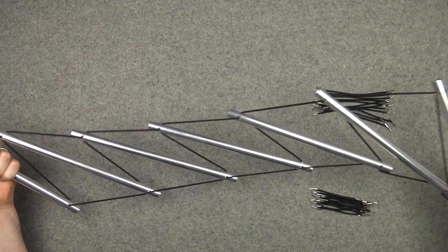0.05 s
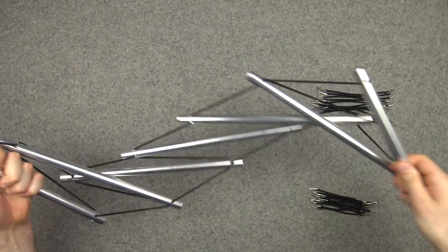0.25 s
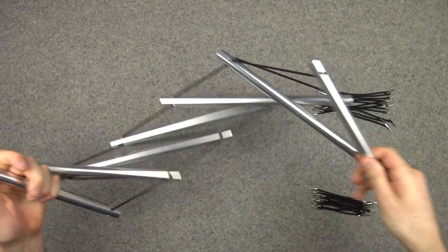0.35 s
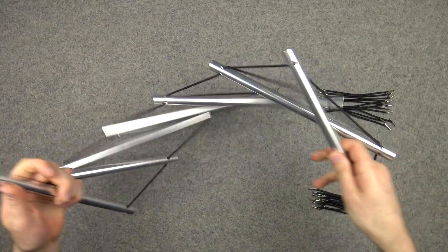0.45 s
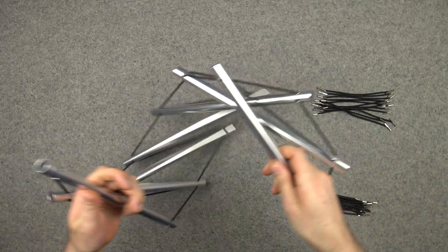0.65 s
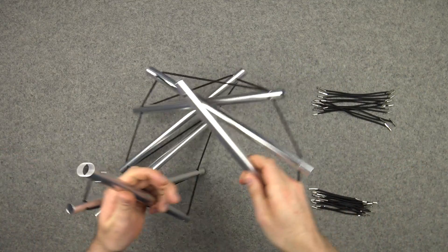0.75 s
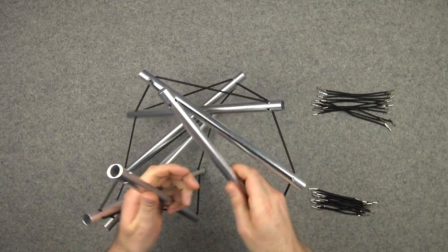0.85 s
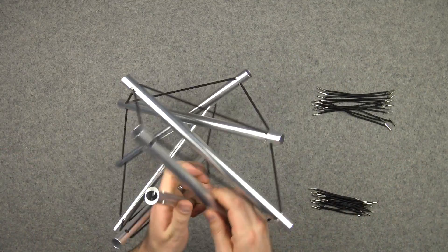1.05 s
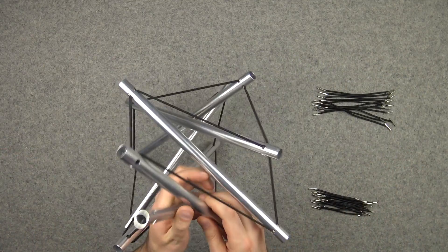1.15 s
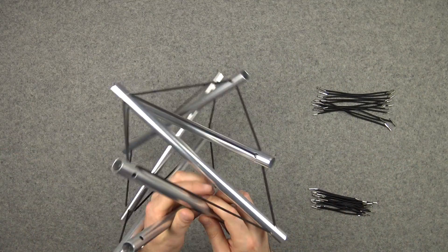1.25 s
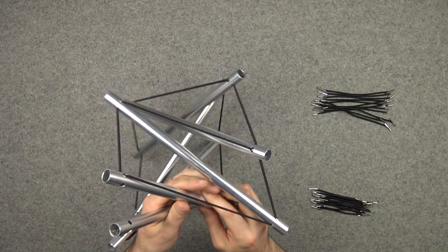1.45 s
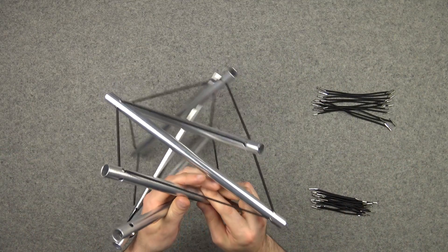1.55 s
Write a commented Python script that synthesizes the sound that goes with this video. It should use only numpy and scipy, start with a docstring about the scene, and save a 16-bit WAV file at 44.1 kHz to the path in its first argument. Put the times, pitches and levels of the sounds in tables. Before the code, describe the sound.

Aluminium tubes clatter together with a bright ring from about 0.2 to 0.5 seconds, ending in a soft bump on carpet. A second burst comes from 0.6 to 0.8 seconds and is damped by hand. The tubes slide with a short rasp around 1 second and clink at 1.15. A faint cord click near 1.4 precedes light taps and rubbing until 1.6, all close over faint room tone.

```python
"""Over a faint room tone, aluminium tubes on elastic cords knock and chatter together in two bursts
as they are gathered up. They bump on a carpeted table, then slide and tap in the hands, close by
in a small room; a cord clicks once. Each collision gives a brief clack and excites the tubes' modes;
sliding friction rasps and drives the same modes, and the hands damp them."""
import sys
import numpy as np
from scipy import signal
from scipy.fft import rfft, irfft
from scipy.io import wavfile

SR = 44100
rng = np.random.default_rng(int(sys.argv[2]) if len(sys.argv) > 2 else 0)


def file_out(sig):
    """Save sig as 16-bit WAV at sys.argv[1]."""
    # one column per channel
    cols = np.atleast_2d(sig).T
    # limit, then scale
    lim = np.clip(cols, -1, 1)
    pcm = np.round(lim * 32767).astype(np.int16)
    wavfile.write(sys.argv[1], SR, pcm)


N = 70560
TIME = np.arange(N) / SR
PIVOT_HZ = 4500  # spectral tilts turn about this frequency


def undb(db):
    return 10 ** (np.asarray(db) / 20)

def unit_rms(x):
    return x / np.sqrt(np.mean(x ** 2) + 1e-20)

def over_time(points):
    return np.interp(TIME, *np.array(points).T)

def over_pitch(points, hz):
    freqs, values = np.array(points).T
    return np.interp(np.log(hz), np.log(freqs), values)

def bin_hz(size):
    return np.maximum(np.fft.rfftfreq(size, 1 / SR), 1)

def add(out, start_s, x):
    i = int(np.clip(start_s * SR, 0, N - 1))
    out[i:i + len(x)] += x[:N - i]


# Each row: frequency in Hz, relative level in dB.
ROOM_TONE_SPECTRUM = [(25, -30), (60, -17.5), (120, -2), (200, -8), (340, 5), (450, -4), (800, -9.5),
                      (1500, -21.5), (4000, -28), (10000, -34.5), (15500, -44.5)]

def room_tone():
    """Filtered noise: a quiet, low background that swells and eases."""
    tone = unit_rms(irfft(rfft(rng.standard_normal(N)) * undb(over_pitch(ROOM_TONE_SPECTRUM, bin_hz(N))), N))
    swell_db = over_time([(.1, -2), (.8, 8), (1.35, 5.5)])
    return tone * undb(-64 + swell_db)


# Bending and wall modes of the nearly equal tubes.
# Each row: frequency in Hz, relative level in dB, free decay time T60 in seconds.
TUBE_MODES = [(991, -22.5, 0.43), (1014.8, -14.5, 0.3), (2688, -4.5, 0.26), (2704, -5.5, 0.19),
              (2784, -11.5, .2), (4900, -9, 0.12), (5054, -3.5, 0.25), (5047, -0.5, 0.18), (5124, -2, 0.21),
              (5280, -10.5, 0.17), (7853, -15.5, 0.34), (7950, -9, 0.33), (8046, -16.5, 0.27),
              (11500, -16, 0.1), (11550, -8, 0.087), (12230, -12.5, 0.061), (12650, -21, .09),
              (12600, -21, 0.04)]

def tube_mode(force, hz, t60):
    """Damped resonance: a unit impulse starts a decaying sine of amplitude 1."""
    r, w = np.exp(-np.log(1000) / (t60 * SR)), 2 * np.pi * hz / SR
    return signal.lfilter([0, r * np.sin(w)], [1, -2 * r * np.cos(w), r * r], force)

def contact_db(hz, tilt, even_db):
    """Modal coupling: hard contacts favour high modes; their position favours even or odd ones."""
    order = round(np.sqrt(hz / TUBE_MODES[0][0]) * 1.55 - .5)
    return tilt * np.log2(hz / PIVOT_HZ) + even_db * (order % 2 == 0)

def radiate(x):
    """Radiation efficiency: thin tubes give off little bass."""
    return signal.sosfilt(signal.butter(4, 924, "high", fs=SR, output="sos"), x)

def colour(x, spectrum, tilt):
    """Minimum-phase filtering: a spectrum, tilted in dB per octave, at unit power gain."""
    size = 2048
    hz = bin_hz(size)
    octaves = np.log2(np.maximum(hz, TUBE_MODES[0][0]) / PIVOT_HZ)
    gain = unit_rms(undb(over_pitch(spectrum, hz) + tilt * octaves))
    cepstrum = irfft(np.log(gain))
    cepstrum[1:size // 2] *= 2
    cepstrum[size // 2 + 1:] = 0
    return signal.fftconvolve(x, irfft(np.exp(rfft(cepstrum))))[:len(x)]


# The dry clack of a contact. Each row: frequency in Hz, relative level in dB.
CLACK_SPECTRUM = [(600, -13), (950, -3), (2000, 4.5), (2450, 3.5), (3000, 11.5), (3600, 8), (4200, 1.5),
                  (4800, 10.5), (5400, 8.5), (6000, 0), (7200, -1.5), (8000, 3), (8900, -9), (10300, -14),
                  (11000, -8.5), (11800, -3.5), (12400, -4), (12650, -1), (12900, -8.5), (13120, -2.5),
                  (13500, -12.5), (14600, -15.5), (15600, -13.5)]
CLACK_DECAY_S = 0.0033
# Each row: time in seconds, relative contact strength in dB.
CHATTER_STRENGTH = [(.2, -38), (.232, -8.5), (.245, -12), (.29, -5), (.335, -0.5), (.365, -3.5), (.40, -4),
                    (.445, -4.5), (.485, -7.5), (.55, -36.5), (.62, -19), (.655, 0.5), (.70, -1.5),
                    (.735, -8), (.79, -12), (.84, -36), (.92, -66)]
# Each row: time in seconds, contact hardness as a tilt in dB per octave.
CHATTER_HARDNESS = [(.22, 2), (.33, -2.5), (.41, -0.5), (.5, -2), (.64, -.5), (.70, -0.5), (.8, -6.5)]

def chatter(contacts_per_s=700, scatter_db=3, ring_db=-41, clack_db=-31):
    """Random impacts: loose tubes bounce on each other, the contacts softening as they settle."""
    moving = (TIME > CHATTER_STRENGTH[0][0]) & (TIME < CHATTER_STRENGTH[-1][0])
    contacts = moving & (rng.random(N) < contacts_per_s / SR)
    spread_db = scatter_db * np.clip(rng.standard_normal(N), -2, 2)
    hits = contacts * undb(over_time(CHATTER_STRENGTH) + spread_db)
    hardness = over_time(CHATTER_HARDNESS)
    ring = sum(tube_mode(hits * rng.standard_normal(N) * undb(db + contact_db(hz, hardness, 0)), hz, t60)
               for hz, db, t60 in TUBE_MODES)
    energy = signal.lfilter([1], [1, -np.exp(-2 / (CLACK_DECAY_S * SR))], hits ** 2)
    bursts = np.sqrt(energy) * rng.standard_normal(N)
    soft, hard = hardness.min(), hardness.max()
    hard_share = (hardness - soft) / (hard - soft)
    clacks = colour(bursts * hard_share, CLACK_SPECTRUM, hard)
    clacks += colour(bursts * (1 - hard_share), CLACK_SPECTRUM, soft)
    return undb(ring_db) * ring + undb(clack_db) * clacks


def impacts(rows, clack_spectrum, rise_s, t60_scale, loss_db_per_octave=0):
    """Modal superposition: each blow clacks and rings all modes, with slightly varied weights."""
    scatter_db, jitter = 1.5, 0.00412
    out, t = np.zeros(N), np.arange(SR * 2 // 3) / SR
    rise = 1 - np.exp(-t / rise_s)
    clack_envelope = np.exp(-t[:SR // 20] / CLACK_DECAY_S)
    for start, ring_db, clack_db, tilt, even_db in rows:
        for hz, db, t60 in TUBE_MODES:
            size, detune, side = rng.standard_normal(3)
            loss_db = loss_db_per_octave * abs(np.log2(hz / PIVOT_HZ))
            gain = undb(ring_db + db + contact_db(hz, tilt, even_db) + scatter_db * size - loss_db)
            envelope = rise * np.exp(-np.log(1000) * t / (t60 * t60_scale))
            tone = np.sign(side) * np.sin(2 * np.pi * hz * (1 + jitter * detune) * t)
            add(out, start, gain * envelope * tone)
        burst = rng.standard_normal(len(clack_envelope)) * clack_envelope
        add(out, start, undb(clack_db) * colour(burst, clack_spectrum, tilt / 2))
    return out


# Each row: start in seconds, ring gain in dB, clack gain in dB, ring tilt in dB per octave,
# even-mode boost in dB.
KNOCKS = [(.204, -70, -61, 8.5, -6), (.2192, -32.5, -43, -1, 3), (.235, -28, -21, 3, -15),
          (.2385, -27.5, -21, 1, -9), (.248, -41, -35, -9.5, 8.5), (.2642, -27, -22, 5.5, -21),
          (.2812, -38, -33, 12.5, -23), (.2955, -30, -26.5, 9.5, -6), (.2992, -30, -31.5, 8, -9.5),
          (.3095, -36, -35, -4, 12.5), (.316, -31.5, -22, 0, -7.5), (.335, -28.5, -45, 4, -14.5),
          (.359, -35, -29.5, -5, 5), (.3758, -29.5, -20, 5.5, -3), (.382, -27.5, -31, 4, 10),
          (.3925, -31, -29.5, 6, 2.5), (.411, -30, -35, -6, -8), (.441, -46, -28.5, 10, 5.5),
          (.479, -44, -63, -9.5, -9), (.613, -42.5, -63, -2.5, 8), (.6298, -41.5, -33.5, 12.5, -0.5),
          (.6463, -24.5, -27.5, 4, 3), (.663, -35, -27.5, 3.5, 12.5), (.674, -30, -29, -8.5, -6),
          (.686, -38, -25.5, -7.5, -18), (.7005, -25, -50, 3.5, -1), (.714, -31, -33.5, -7, -6.5),
          (.724, -31.5, -19.5, -2.5, -29), (.765, -36, -51, 3.5, 3.5), (.778, -33.5, -57, -6.5, -34)]

def knocks():
    """Free vibration: loose tubes collide and ring on, lightly damped."""
    return impacts(KNOCKS, CLACK_SPECTRUM, rise_s=0.0018, t60_scale=0.93)


# Each row: frequency in Hz, relative level in dB.
RASP_SPECTRUM = [(150, -34), (520, -8), (760, 11.5), (1050, 12.5), (1350, 2.5), (2300, 3), (2800, 2.5),
                 (3600, -8), (5000, -5), (6300, -11.5), (7400, -6), (8150, 9), (8900, -11.5), (10200, -17),
                 (11050, 1.5), (11600, -13), (12150, 0.5), (12600, 1.5), (13100, -1), (14500, -17.5),
                 (15500, -8.5)]
# Each row: peak time, rise and fall in seconds, ring and rasp gains in dB, tilt in dB per octave,
# even-mode boost in dB.
SLIDES = [(0.228, 0.013, 0.0061, -43.5, -64.5, -8.5, 15), (.29, 0.042, 0.1, -55.5, -33.5, 11.5, -11),
          (.598, .006, 0.016, -54, -49, 8, -1), (0.649, 0.017, 0.0043, -29, -61, -0.5, 6.5),
          (0.989, 0.016, 0.036, -48.5, -43, 3, 12.5), (1.041, 0.039, 0.045, -40, -36, 0.5, -1),
          (1.444, 0.014, 0.019, -67, -58, 3.5, 23), (1.535, 0.017, 0.018, -67, -60, 2.5, 1),
          (1.59, 0.026, 0.018, -45.5, -50, 1, 5.5)]

def slides(grain_db=4, t60_scale=0.51, swell_shape=1.41):
    """Frictional excitation: tube rubs on tube with a grainy rasp that drives the damped modes."""
    rasp, ring, drives = np.zeros(N), np.zeros(N), np.zeros((len(TUBE_MODES), N))
    for peak, rise, fall, ring_db, rasp_db, tilt, even_db in SLIDES:
        from_peak = (TIME - peak) / np.where(TIME < peak, rise, fall)
        swell = np.exp(1 - np.hypot(1, np.sqrt(2) * from_peak) ** swell_shape)
        grains = unit_rms(rng.standard_normal(N) * undb(grain_db * rng.standard_normal(N)))
        rasp += undb(rasp_db) * colour(swell * grains, RASP_SPECTRUM, tilt)
        gains = [undb(ring_db + db + contact_db(hz, tilt, even_db)) for hz, db, _ in TUBE_MODES]
        drives += np.outer(gains, swell)
    for drive, (hz, _, free_t60) in zip(drives, TUBE_MODES):
        t60 = free_t60 * t60_scale
        ring += tube_mode(drive * rng.standard_normal(N), hz, t60) * np.sqrt(np.log(1000) / (t60 * SR))
    return rasp + radiate(ring)


# Each row: start in seconds, gain in dB, centre in Hz, width in octaves, decay in seconds.
BUMPS = [(.398, -47, 389, 0.57, 0.073), (0.476, -34.5, 450, 0.74, 0.024), (0.556, -46, 358, 0.13, 0.039),
         (0.549, -43.5, 1022, 0.033, 0.13), (.775, -48.5, 33.2, 0.34, 0.083),
         (0.78, -59.5, 91, 0.32, 0.052), (.835, -54, 499, 0.084, .07), (.95, -51.5, 508, 0.02, 0.07),
         (1.116, -51, 343, 0.13, 0.018), (1.208, -47.5, 347, 0.17, 0.014), (1.249, -53, 340, 0.29, 0.011),
         (1.451, -49.5, 352, 0.11, 0.029), (1.481, -49, 363, 0.11, 0.011), (1.586, -36, 112, 0.27, 0.012)]

def bumps():
    """Soft impacts: tubes thud on carpet, cords and hands; the narrow noise bands ring briefly."""
    out, t = np.zeros(N), np.arange(SR // 2) / SR
    for start, db, hz, octaves, decay in BUMPS:
        band = np.exp(-.5 * (np.log2(bin_hz(len(t)) / hz) / octaves) ** 2)
        phases = np.exp(2j * np.pi * rng.random(len(band)))
        body = unit_rms(irfft(band * phases, len(t)))
        envelope = np.exp(-t / decay) * (1 - np.exp(-t * hz))
        add(out, start, undb(db) * body * envelope)
    return out


def grip(start_s=0.777, db_per_s=123):
    """Exponential damping: the hands close on the bundle and choke the ring."""
    return undb(-db_per_s * np.maximum(TIME - start_s, 0))


# Each row: frequency in Hz, relative level in dB.
TAP_CLACK_SPECTRUM = [(1000, -17), (3800, -19.5), (4600, 3), (5200, 4.5), (6000, -5), (7000, 2.5),
                      (7900, 13.5), (8800, -15), (10200, -15), (11100, 7), (12200, -8), (13200, -10),
                      (14000, -22), (15500, -30)]
# Each row: start in seconds, ring gain in dB, clack gain in dB, ring tilt in dB per octave,
# even-mode boost in dB. The row at 1.3945 s is the cord click.
TAPS = [(1.1555, -28.5, -38, 5.5, -9), (1.1722, -49, -48, 15, -23), (1.189, -46.5, -65, 12.5, -0.5),
        (1.206, -51.5, -64.5, 0, 0.5), (1.3945, -76, -54.5, -10, -15), (1.463, -66, -67.5, -7, 14),
        (1.516, -62, -59, 7, 4), (1.533, -54, -44, 9, -1), (1.5502, -57, -46, 14.5, 12)]

def taps():
    """Damped vibration: held tubes tap with a quickly damped ring, and a cord clicks once."""
    return impacts(TAPS, TAP_CLACK_SPECTRUM, rise_s=0.00048, t60_scale=0.19, loss_db_per_octave=5)


# Each row: frequency in Hz, reverberation time in seconds.
ROOM_T60 = [(300, 0.302), (1500, 0.31), (4000, 0.39), (8000, 0.27), (14000, 0.15)]

def reverberation(x, onset_s=0.0014):
    """Diffuse reflection: a short tail decays in octave bands, the highest treble first."""
    t = np.arange(SR // 2) / SR
    noise, hz = rfft(rng.standard_normal(len(t))), bin_hz(len(t))
    centres = 125 * 2. ** np.arange(8)
    tail = np.zeros(len(t))
    for centre, pick in zip(centres, np.eye(len(centres))):
        band = irfft(noise * np.interp(np.log(hz), np.log(centres), pick), len(t))
        tail += band * np.exp(-np.log(1000) * t / over_pitch(ROOM_T60, centre))
    tail *= 1 - np.exp(-(t / onset_s) ** 2)
    return signal.fftconvolve(x, unit_rms(tail) / np.sqrt(len(t)))[:N]


def scene():
    """Superposition: direct sound, reverberation and room tone add in one channel."""
    gathering = grip() * radiate(knocks() + chatter()) + slides() + bumps()
    tapping = radiate(taps())
    reflected = reverberation(undb(-6) * gathering + undb(-11) * tapping)  # nearer taps sound drier
    return (gathering + tapping + reflected + room_tone())[None]

def record(dry):
    """Band limiting: a steep low-pass filter cuts the highest treble."""
    return signal.sosfilt(signal.ellip(10, .2, 80, 15600, fs=SR, output="sos"), dry)


dry = scene()
out = record(dry)
file_out(out)
```